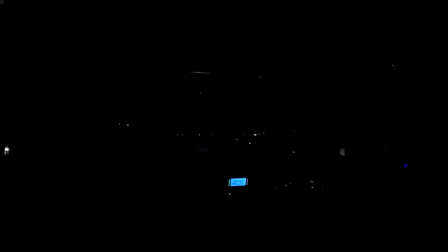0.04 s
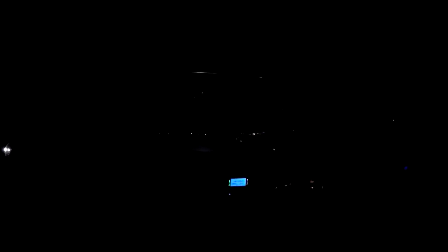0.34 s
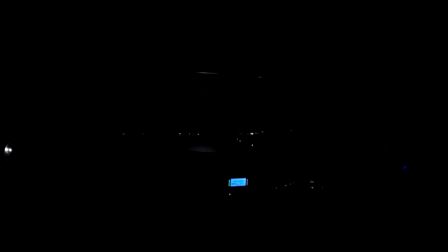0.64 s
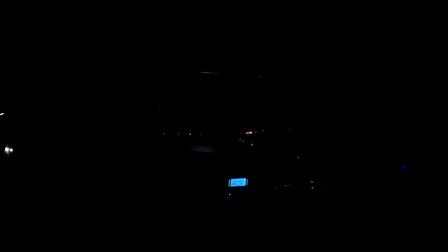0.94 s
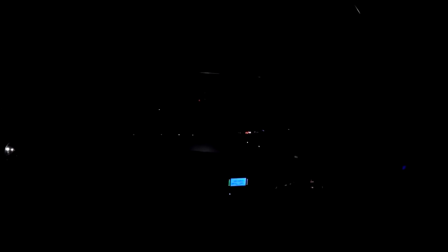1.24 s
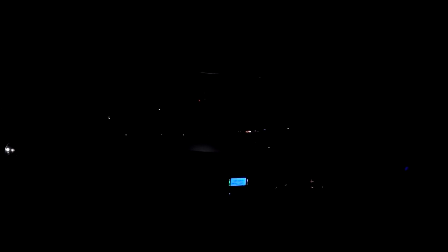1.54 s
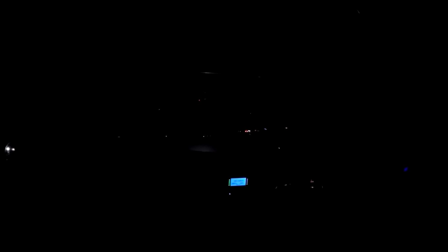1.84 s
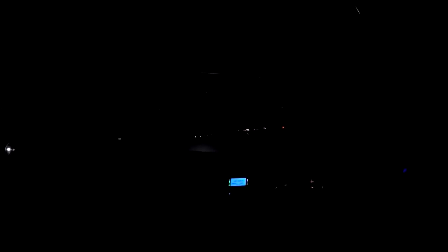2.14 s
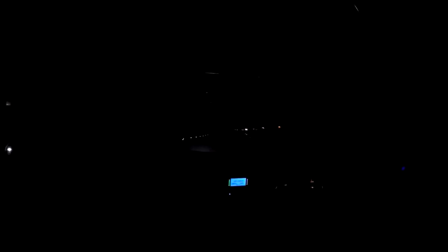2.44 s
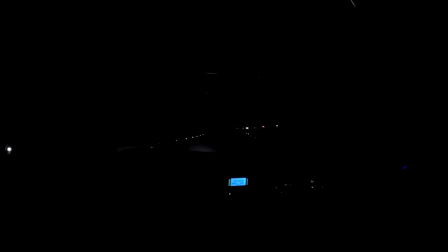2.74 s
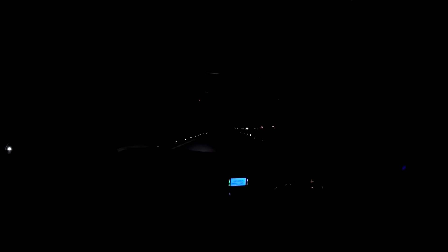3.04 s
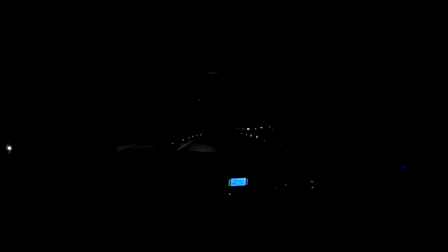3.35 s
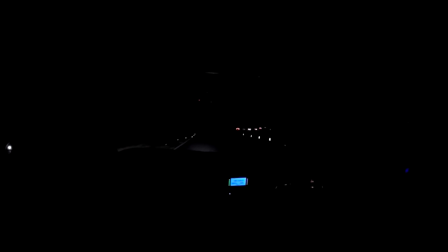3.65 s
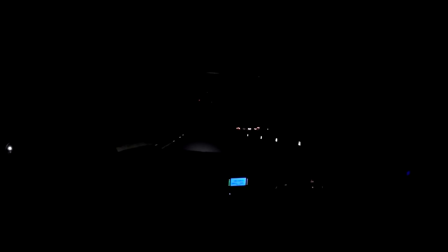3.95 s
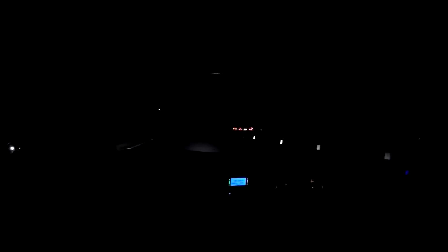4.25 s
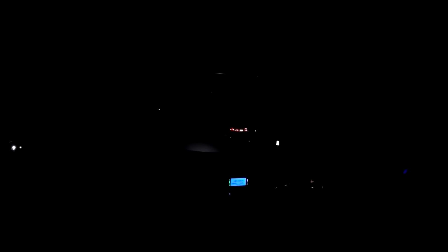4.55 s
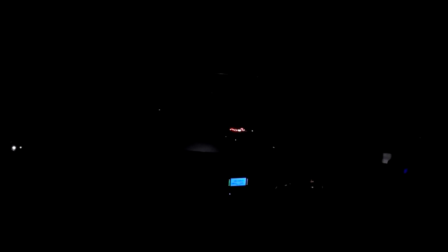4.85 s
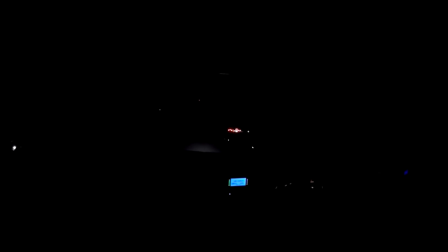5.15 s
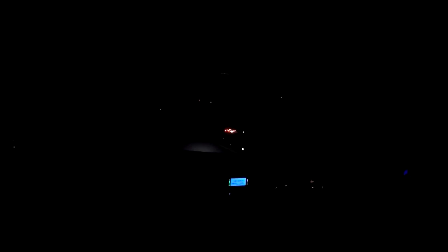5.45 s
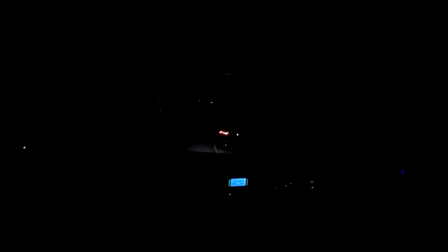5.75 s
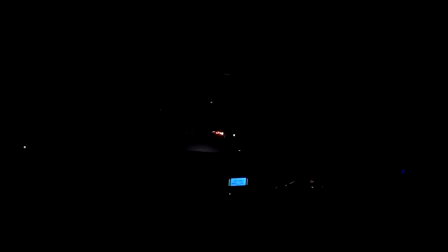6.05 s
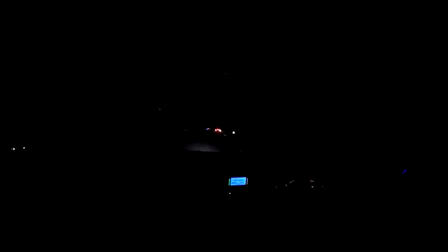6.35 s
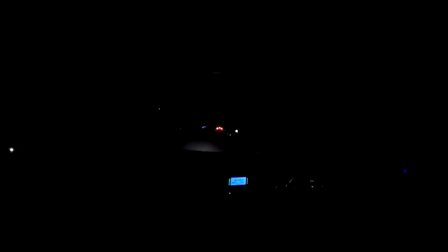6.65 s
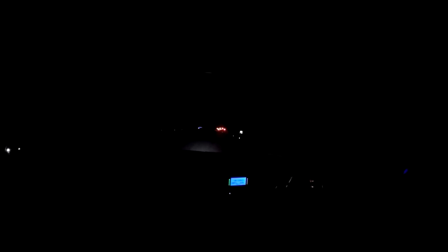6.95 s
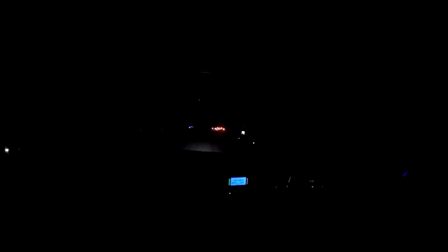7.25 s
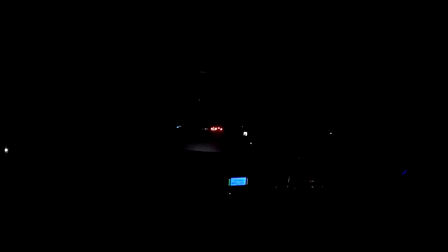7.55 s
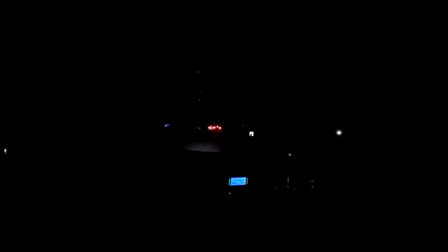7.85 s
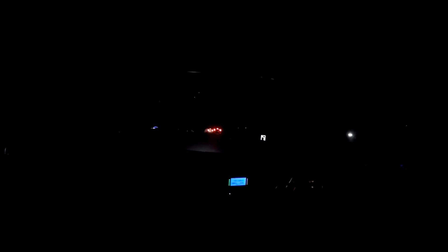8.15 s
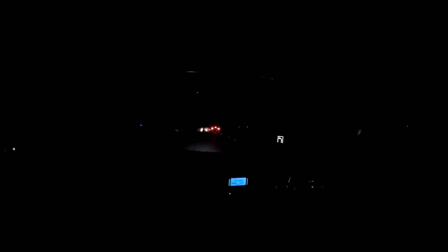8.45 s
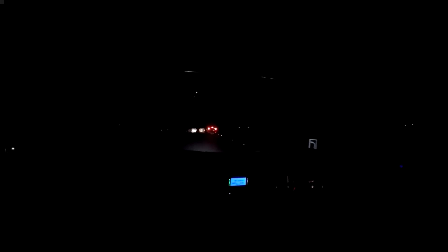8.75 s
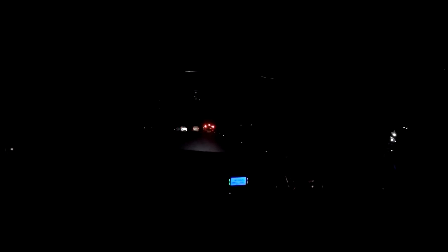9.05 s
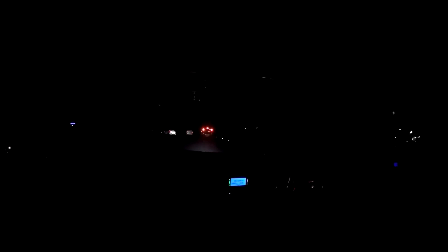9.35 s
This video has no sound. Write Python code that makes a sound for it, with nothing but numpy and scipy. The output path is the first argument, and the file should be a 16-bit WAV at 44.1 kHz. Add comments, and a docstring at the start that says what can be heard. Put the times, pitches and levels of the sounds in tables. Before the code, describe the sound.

Heard from inside the cabin, a race car holds top speed with a booming engine drone, tyre roar, a faint whine and wind whistling at gaps in the body. The rough track sends repeated thuds through the chassis. The engine eases off, then the car brakes with a low shudder and sinking revs, finishing with two short, barking throttle blips as it shifts down.

```python
"""A race car's engine, heard from inside: it drones flat out, lifts, then slows through two
blipped downshifts. Exhaust pulses boom and bark in the cabin; shaft orders whine in the casing.
Road speed sets the revs and the noises: the road rumbles and thumps through the hollow body,
braking shakes the chassis, and air hisses over the body and whistles at its gaps.
The onboard camera's limiter ducks after the hardest bumps."""
import sys
import numpy as np
from scipy import signal
from scipy.fft import rfft, irfft, next_fast_len
from scipy.io import wavfile
from scipy.ndimage import map_coordinates

SR = 44100
rng = np.random.default_rng(int(sys.argv[2]) if len(sys.argv) > 2 else 0)


def pcm_store(signal):
    """Save signal as 16-bit PCM."""
    levels = np.round(np.clip(np.atleast_2d(signal), -1, 1) * 32767)
    wavfile.write(sys.argv[1], SR, levels.astype(np.int16).T)


N = 414981
FLAT_OUT_HZ, FIRINGS_PER_CYCLE = 50, 4
COAST_MID_S, COAST_LENGTH_S = 5.15, 1.64  # the driver lifts

# Each row: firing rate in Hz, cabin boom gain in dB.
BOOM_RESPONSE = [(108, -16.5), (128, -18.5), (145, -23), (162, -22.5), (174, -36.5), (188, -21.5),
                 (203, -25.5)]
# Each row: multiple of the cycle rate, relative level in dB.
DRONE_ORDERS = [(2, -10), (8, -12), (10, -5), (11, 0.5), (12, -6), (14, -12), (18, -21), (20, -21)]
# Engine load. Each row: time in seconds, drone gain in dB.
ENGINE_LOAD = [(0, -21.5), (1.2, -19), (2.1, -21.5), (2.5, -19), (3.2, -19.5), (4.1, -28), (5, -33),
               (6.1, -26), (9.41, -38)]


def engine(cycle_hz, throttle, bark_gain):
    """The exhaust booms at the firing rate, shaft orders drone under load, and each blip barks."""
    cycle = turns(cycle_hz * (1 + .001 * wobble(14)))
    boom_db = np.interp(FIRINGS_PER_CYCLE * cycle_hz, *np.transpose(BOOM_RESPONSE))
    boom_db += 5 * throttle - 18.5 * swell(COAST_MID_S, COAST_LENGTH_S)
    boom = amp(boom_db + .66 * wobble(16)) * unit(np.sin(2 * np.pi * FIRINGS_PER_CYCLE * cycle))
    drone = unit(sum(amp(db + wobble(2.5) + wobble(29)) * np.sin(2 * np.pi * (k * cycle + rng.random()))
                     for k, db in DRONE_ORDERS))
    drone = drone + resonate(drone, [(614, 9.9, 3)])  # a panel sings along near top speed
    rough = bark(cycle, scatter_db=1.5, cutoff_hz=760, jitter=.016, rasp=.55)
    lope = .56 * np.sin(2 * np.pi * 2 * cycle)  # strong and weak firings alternate
    return boom + amp(curve(ENGINE_LOAD)) * drone / np.sqrt(2) + bark_gain * (rough + lope)


# Relative pulse strength of each cylinder, in firing order.
CYLINDER_GAINS = [1.5, 0.92, 0.73, 0.6]
# Each row: centre in Hz, width in Hz, gain in dB.
CABIN_MODES = [(238, 70, -8.5), (444, 111, -2), (517, 70, 4.5), (609, 130, -2.5)]


def bark(cycle, scatter_db, cutoff_hz, jitter, rasp):
    """One uneven pulse and a puff of gas per firing ring the cabin."""
    firing = cycle * FIRINGS_PER_CYCLE + jitter * wobble(130)
    at = np.flatnonzero(np.diff(np.floor(firing)))
    pulses = np.zeros(N)
    pulses[at] = np.resize(CYLINDER_GAINS, len(at)) * amp(scatter_db * rng.standard_normal(len(at)))
    puffs = rng.standard_normal(N) * np.exp(-np.pi * (firing % 1))
    cabin = resonate(unit(pulses) + rasp * unit(puffs), CABIN_MODES)
    return unit(lowpass(cabin, cutoff_hz, order=6))


# Each row: start in seconds, length in seconds, step in gear ratio, bark gain in dB.
DOWNSHIFTS = [(7.796, .135, 1.35, -14.5), (9.03, .16, 1.5, -16)]


def gearbox(attack_s, release_s, idle_bark_db):
    """Engine cycle rate, throttle blips (0-1) and bark gain: each downshift lifts the revs."""
    t = np.arange(N) / SR
    cycle_hz, throttle, bark_gain = FLAT_OUT_HZ * road_speed(), 0, amp(idle_bark_db)
    for start_s, length_s, step, bark_db in DOWNSHIFTS:
        cycle_hz = cycle_hz * np.interp(t, [start_s, start_s + length_s], [1, step])
        opening = np.clip((t - start_s) / attack_s, 0, 1)
        closing = np.clip(1 - (t - start_s - length_s) / release_s, 0, 1)
        blip = opening * closing
        throttle = throttle + blip
        bark_gain = bark_gain + amp(bark_db) * blip
    return cycle_hz, throttle, bark_gain


# Each row: time in seconds, road speed as the top-gear engine cycle rate in Hz.
ROAD_SPEED = [(0, 47.8), (1.9, 50), (3.25, 51), (4.6, 48.5), (5.4, 46.7), (5.95, 46.8), (6.3, 45.4),
              (6.65, 41.3), (7.3, 36), (7.82, 32.2), (8.15, 30.3), (8.3, 27.8), (8.55, 25.2), (8.8, 22),
              (9.02, 20.1), (9.27, 19.3), (9.41, 18)]


def road_speed():
    """Road speed as a share of flat out."""
    return curve(ROAD_SPEED) / FLAT_OUT_HZ


# Two spectra. Each row: frequency in Hz, relative density in dB.
RUMBLE_SPECTRUM = [(12, -21.5), (20, 4), (28, 0), (70, -6.5), (150, -14.5), (300, -28.5), (600, -59)]
ROAR_SPECTRUM = [(80, -28.5), (190, -5.5), (330, -5), (450, -3), (545, 0.5), (630, -4.5), (720, -10.5),
                 (900, -19.5), (1060, -19), (1350, -36.5), (2500, -60)]
# Slow rise and fall of the rumble, roar and rush, easing as the car coasts.
# Each row: time in seconds, gain in dB.
NOISE_SWELL = [(0, 0), (3.2, -0.4), (4.1, -0.6), (4.8, -1.5), (5.1, -0.9), (5.7, 0.5), (6.5, 0),
               (7.3, -1.5), (8.45, .5), (8.75, -2), (9.41, 0)]


def road(bark_gain):
    """The chassis rumbles and the tyres roar in the shell, both jolted by the rough surface."""
    swell_db, jolts = curve(NOISE_SWELL), wobble(35)
    rumble_db = speed_db(-14, per_doubling_db=2.5) + .7 * swell_db
    rumble = amp(rumble_db + 2.2 * jolts) * noise(RUMBLE_SPECTRUM)
    roar_db = speed_db(-18, per_doubling_db=5.56) + swell_db
    tyre_share = 1 / (1 + (bark_gain / amp(roar_db)) ** 4)  # an open throttle takes over the roar
    roar = amp(roar_db + 1.13 * jolts + .47 * wobble(150)) * tyre_share * noise(ROAR_SPECTRUM)
    return rumble + roar


# Each row: start in seconds, then thud, knock and crack gains in dB.
BUMPS = [(1.147, -7, -2, -34), (1.61, -9, -1, -33), (1.772, -9, -1, -34), (2.022, 1, 2, -17),
         (2.215, -3, -3, -24), (2.51, -1, -5, -27), (2.535, -1, -4, -34), (3.53, -18, -16, -21),
         (3.814, -3, -3, -27), (4.29, -4, -7, -26), (4.625, -4, -6, -14.5), (5.565, -12, -5, -25),
         (7.215, -3, -4, -23), (7.509, -4, -5, -24), (8.2, -3, -7.5, -31), (8.556, 4, 1, -15),
         (8.592, -1, -2, -38)]


def bumps(thud_hz, thud_t60_s, knock_t60_s, crack_t60_s):
    """Each bump heaves the chassis, rattles the cabin and cracks a panel."""
    t = np.arange(SR // 5) / SR
    out = np.zeros(N + len(t))
    shell = noise(ROAR_SPECTRUM)  # the body's many close modes
    attack = 1 - np.exp(-t / .0017)

    def decay(t60_s):
        return amp(-60 * t / t60_s)

    def ring(hz, t60_s):
        return np.sin(2 * np.pi * hz * (1 + .047 * rng.standard_normal()) * t) * decay(t60_s)

    for start_s, thud_db, knock_db, crack_db in BUMPS:
        at = int(start_s * SR) + np.arange(len(t))
        thud = ring(thud_hz, thud_t60_s) + .93 * ring(202, knock_t60_s)
        knock = ring(590, knock_t60_s) + .45 * shell[at] * decay(.09)
        crack = ring(1280, crack_t60_s)
        crack += 3 * lowpass(rng.standard_normal(len(t)), 1750, order=3) * decay(crack_t60_s)
        out[at] += (amp(thud_db) * thud + amp(knock_db) * knock + amp(crack_db) * crack) * attack
    return out[:N]


# Each row: time in seconds, level in dB.
BRAKE_SHUDDER = [(6.1, -48.5), (6.4, -19), (7.1, -16), (7.7, -40)]


def brakes():
    """Hard braking shakes the chassis at one low resonance."""
    return amp(curve(BRAKE_SHUDDER)) * unit(resonate(noise(RUMBLE_SPECTRUM), [(71.5, 6.4, 0)]))


# Three spectra. Each row: frequency in Hz, relative density in dB.
RUSH_SPECTRUM = [(500, -22.5), (1000, 2.5), (1750, 4.5), (2450, -2), (2900, -7), (6000, -52.5)]
HISS_SPECTRUM = [(2200, -22), (3100, -2.5), (3750, 3), (4700, -7.5), (5600, -6), (7200, -15), (8200, -28.5),
                 (12000, -39.5)]
FINE_HISS_SPECTRUM = [(5000, -25), (8000, -2), (9600, 3), (12000, -2), (15000, -3.5)]
# Each row: crest time in seconds, length in seconds, hiss gain in dB.
GUSTS = [(.48, 0.89, 3), (0.935, 0.3, 4.5), (3.214, 1, 3.5), (7.538, 0.27, 6), (8.157, 0.39, 6)]


def air(throttle):
    """Turbulent air rushes over the body, growing with speed and in gusts."""
    gust_db = sum(db * swell(crest_s, length_s) for crest_s, length_s, db in GUSTS)
    flutter_db, intake_db = wobble(40), .5 * throttle
    rush_db = speed_db(-39, per_doubling_db=5.4) + .15 * gust_db + curve(NOISE_SWELL)
    hiss_db = speed_db(-49, per_doubling_db=6.4) + gust_db + intake_db
    fine_db = speed_db(-63, per_doubling_db=11) + gust_db
    rush = amp(rush_db + .5 * flutter_db) * noise(RUSH_SPECTRUM)
    hiss = amp(hiss_db + flutter_db) * noise(HISS_SPECTRUM)
    fine_hiss = amp(fine_db + flutter_db) * noise(FINE_HISS_SPECTRUM)
    return rush + hiss + fine_hiss


# Each row: centre in Hz, width in Hz, gain in dB.
CASING_MODES = [(1917, 37, 0)]


def whine(cycle_hz, weak_order_db, coast_db):
    """High shaft orders sing in turn as the revs carry them through the engine casing's resonance."""
    cycle = turns(cycle_hz * (1 + .0015 * wobble(40)))
    orders = np.zeros(N)
    for k in range(36, 56):
        order_db = weak_order_db if k % FIRINGS_PER_CYCLE else 0
        orders += amp(order_db) * np.sin(2 * np.pi * (k * cycle + rng.random()))
    level_db = speed_db(-47.5, per_doubling_db=3) + coast_db * swell(COAST_MID_S, 2 * COAST_LENGTH_S)
    return amp(level_db + 2 * wobble(9.7)) * unit(resonate(orders, CASING_MODES))


# Each row: crest time in seconds, length in seconds, nominal crest pitch in Hz, crest level in dB,
# pitch sag at the ends as a share.
WHISTLES = [(.38, 0.8, 5640, -47.5, 0.031), (0.882, 0.14, 5700, -46, 0.046), (1.05, .2, 5580, -47.5, .025),
            (1.374, .4, 5670, -53, .04), (1.88, 0.41, 5670, -52, .03), (2.262, 0.43, 5750, -52, 0.038),
            (2.528, .28, 6080, -56, 0.064), (2.805, 0.46, 5780, -55.5, 0.033),
            (3.08, 0.33, 5570, -48, .015), (3.246, 0.15, 5660, -45.5, .03), (3.7, 0.43, 5850, -54, 0.074),
            (4.237, 0.47, 5800, -59, .04), (4.7, 0.9, 5460, -55, 0.037), (5.652, 0.93, 5300, -58, 0.048),
            (5.6, 3.1, 9430, -67.5, .16), (6.35, 1.1, 7900, -67, 0.11), (6.653, 0.45, 7500, -63, .08),
            (6.969, 0.52, 7250, -54.5, .08), (7.332, 0.49, 6970, -56.5, .11), (7.458, 0.15, 6400, -59, .1),
            (7.69, .14, 6700, -55.5, 0.1), (7.81, 0.14, 6470, -57, 0.09), (7.995, .18, 5850, -57.5, .1),
            (8.31, 0.29, 5840, -56, .13), (8.798, 0.12, 5850, -65, .14)]


def whistles(smear, flicker_db):
    """Edge tones at gaps swell and fade, arching in pitch; they hop between close pitches and sputter."""
    out, speed = np.zeros(N), road_speed()
    sputter = 1 + .7 * np.tanh(wobble(65))
    voices = [(ratio * (1 + smear * wobble(700)), np.tanh(2 * wobble(45)), amp(flicker_db * wobble(30)))
              for ratio in (.99, 1.04)]
    for crest_s, length_s, hz, db, sag in WHISTLES:
        start, end = int((crest_s - length_s / 2) * SR), int((crest_s + length_s / 2) * SR)
        at = np.arange(max(start, 0), min(end, N))
        arch = 1 - (2 * (at / SR - crest_s) / length_s) ** 2
        pitch_hz = hz * (speed[at] / speed[int(crest_s * SR)]) ** .99 * (1 + sag * (arch - 1))
        tones = []
        # A whistle that bends far also wavers more and splits in two.
        for detune, hops, gain in voices:
            voice_hz = detune[at] * pitch_hz * (1 + .28 * sag * hops[at])
            tones.append(gain[at] * np.sin(2 * np.pi * turns(voice_hz)))
        tone = tones[0] + amp(-14.5 + 69 * sag) * tones[1]
        out[at] += amp(db) * np.sqrt(np.abs(arch)) * unit(sputter[at] * tone)
    return out


def speed_db(flat_out_db, per_doubling_db):
    """Level of a sound that grows with road speed."""
    return flat_out_db + per_doubling_db * np.log2(road_speed())


def amp(db):
    return 10 ** (np.asarray(db) / 20)


def unit(x):
    return x / np.sqrt(np.mean(x ** 2) + 1e-20)


def curve(rows):
    """One value per sample from (seconds, value) rows."""
    return np.interp(np.arange(N) / SR, *np.transpose(rows))


def swell(crest_s, length_s):
    """A smooth rise from 0 to 1 and back."""
    return np.cos(np.pi * np.clip((np.arange(N) / SR - crest_s) / length_s, -.5, .5)) ** 2


def wobble(knots_per_s):
    """A smooth random curve."""
    knots = rng.standard_normal(int(N * knots_per_s / SR) + 4)
    return map_coordinates(knots, [np.arange(N) * knots_per_s / SR])


def turns(hz):
    """Running count of cycles."""
    return np.cumsum(hz) / SR


def filtered(x, response):
    """x through a complex frequency response."""
    size = next_fast_len(N + SR // 2)
    return irfft(rfft(x, size) * response(np.fft.rfftfreq(size, 1 / SR)), size)[:N]


def resonate(x, modes):
    """x through (centre Hz, width Hz, dB) resonances of alternating sign."""
    return filtered(x, lambda f: sum(
        (-1) ** k * amp(db) * 1j * f * width / (hz * hz - f * f + 1j * f * width)
        for k, (hz, width, db) in enumerate(modes)))


def lowpass(x, cutoff_hz, order):
    return signal.sosfilt(signal.butter(order, cutoff_hz, fs=SR, output='sos'), x)


def noise(spectrum):
    """Noise of rms 1 coloured by (Hz, dB) points."""
    hz, db = np.transpose(spectrum)
    colour = lambda f: amp(np.interp(np.log(f + 1), np.log(hz), db, left=-120, right=-120))
    return unit(filtered(rng.standard_normal(N), colour))


def scene():
    """Engine, chassis and airflow in mono."""
    cycle_hz, throttle, bark_gain = gearbox(attack_s=.021, release_s=.05, idle_bark_db=-31)
    gaps = whistles(smear=.009, flicker_db=2.2)
    chassis = road(bark_gain) + brakes()
    chassis += bumps(thud_hz=65, thud_t60_s=.1, knock_t60_s=.04, crack_t60_s=.025)
    mix = engine(cycle_hz, throttle, bark_gain) + chassis + air(throttle) + gaps
    mix += whine(cycle_hz, weak_order_db=-4, coast_db=-4.5)
    return mix[None]


def record(dry):
    """A soft limiter ducks after peaks and recovers slowly; what slips past it is clipped."""
    recovery_db_per_s, ceiling, top_hz = 16, .99, 15200
    x = dry[0]
    over_db = .75 * np.maximum(20 * np.log10(np.abs(x) + 1e-9), 0)
    recovery_db = recovery_db_per_s * np.arange(N) / SR
    duck_db = np.maximum.accumulate(over_db + recovery_db) - recovery_db
    ducked = x * amp(-lowpass(duck_db, cutoff_hz=16, order=1))
    clipped = ducked / (1 + np.abs(ducked / ceiling) ** 6) ** (1 / 6)
    return filtered(clipped, lambda hz: hz < top_hz)[None]


dry = scene()
out = record(dry)
pcm_store(out)
```